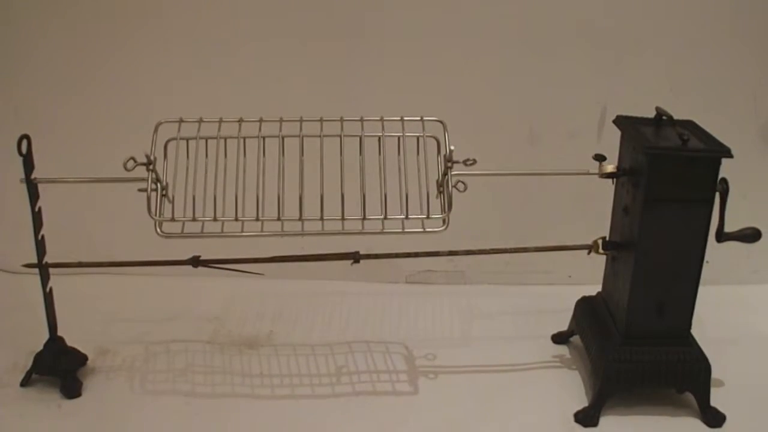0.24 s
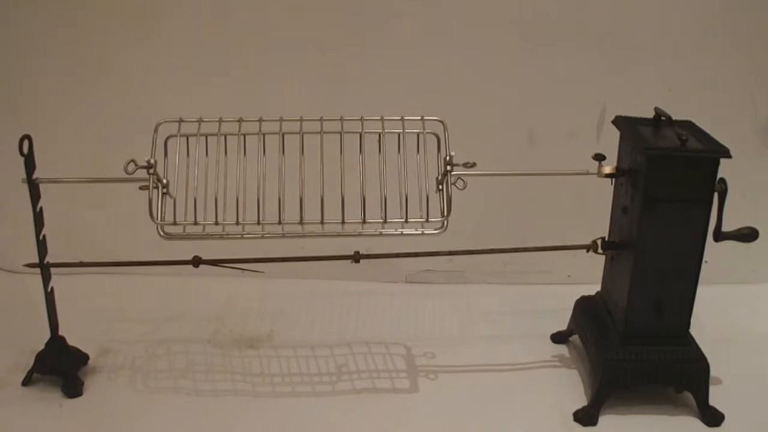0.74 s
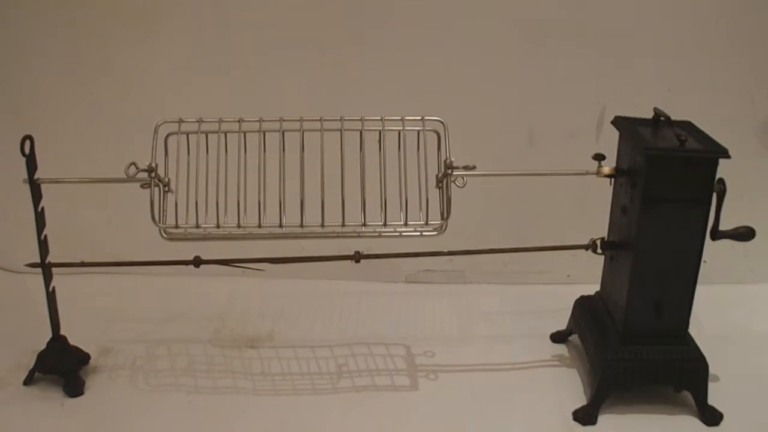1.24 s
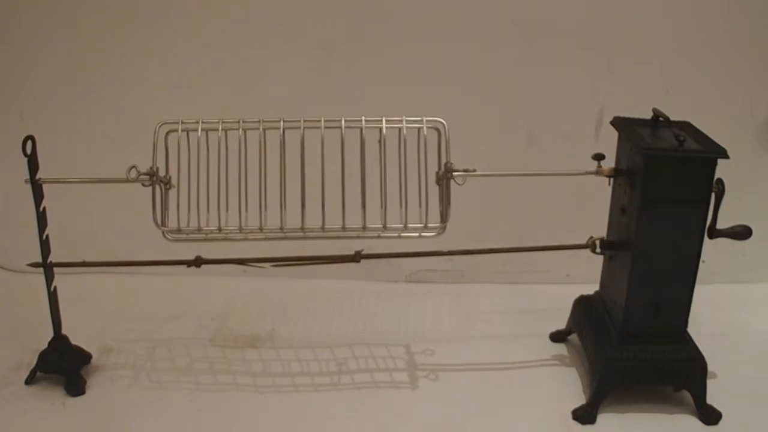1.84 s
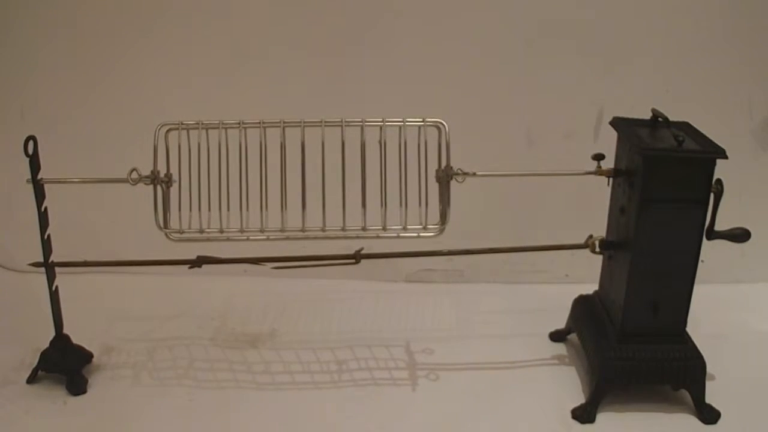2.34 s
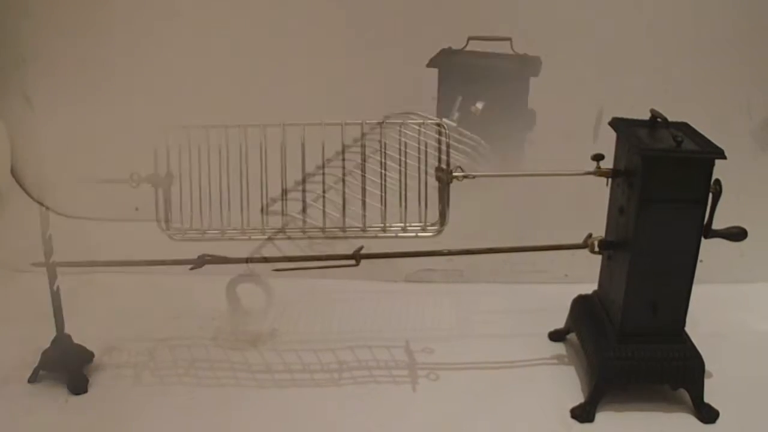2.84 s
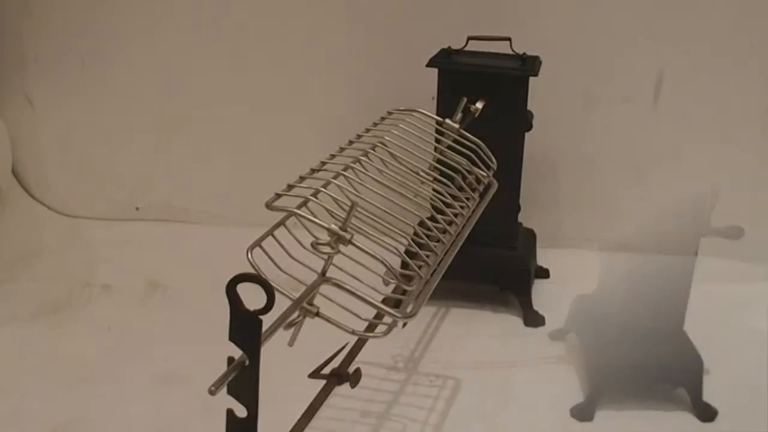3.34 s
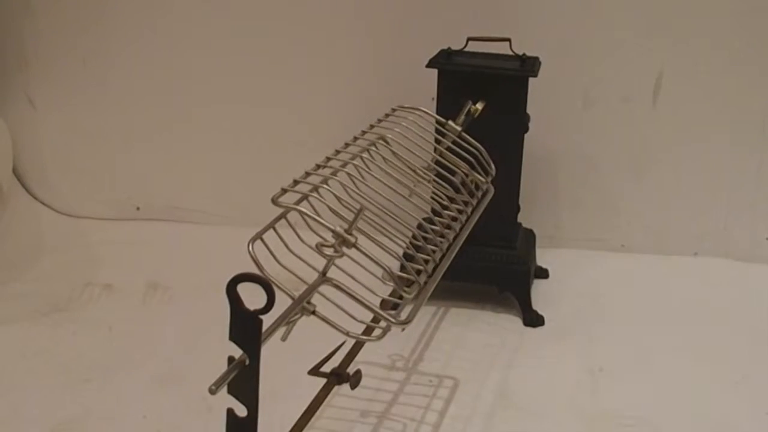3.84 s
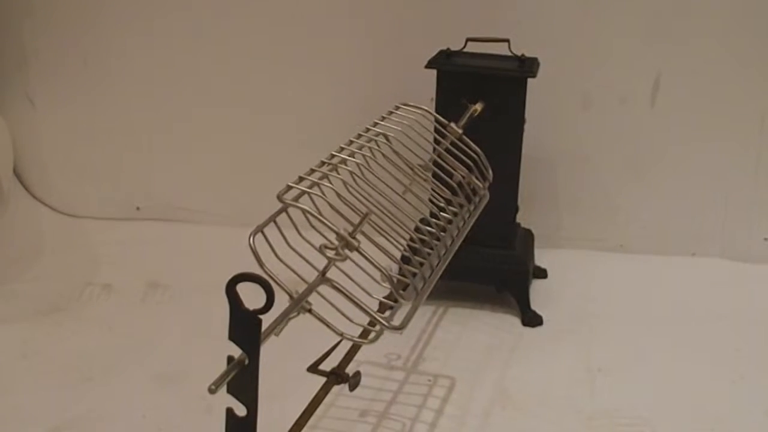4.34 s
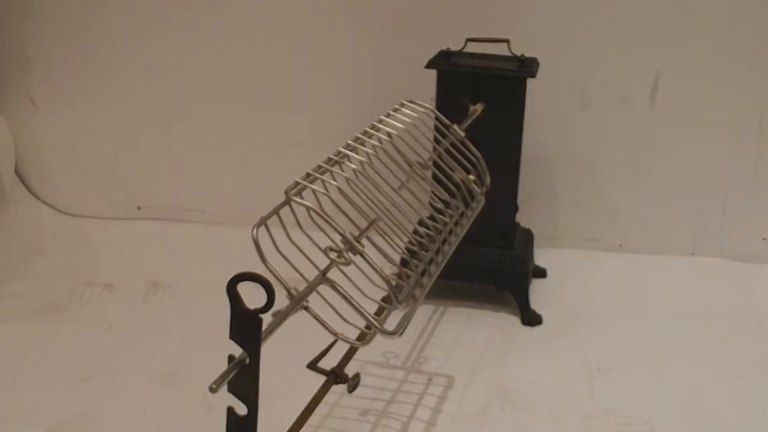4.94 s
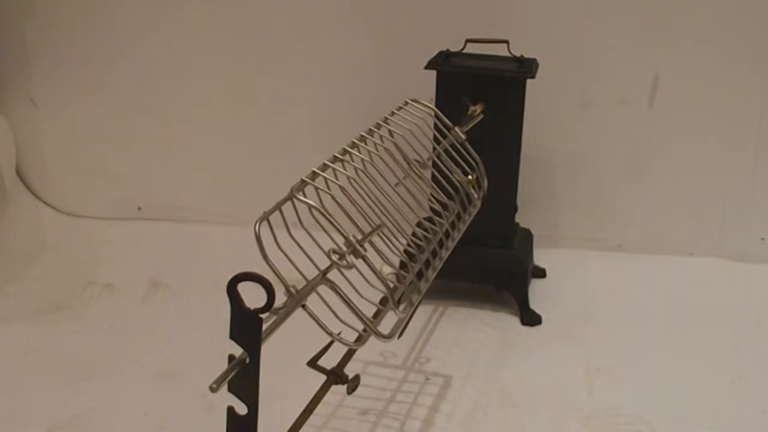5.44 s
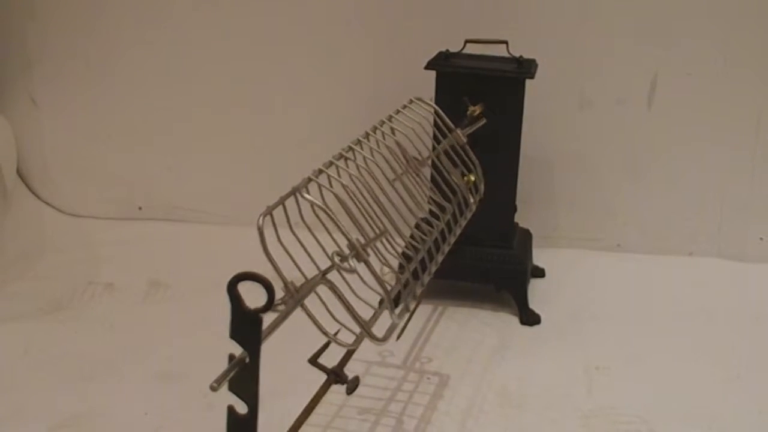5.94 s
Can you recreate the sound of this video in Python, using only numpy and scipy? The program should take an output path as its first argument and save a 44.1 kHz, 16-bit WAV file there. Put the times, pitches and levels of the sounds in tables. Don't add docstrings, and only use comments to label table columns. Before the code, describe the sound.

A spring-wound iron roasting jack whirs steadily with metallic gear ticking, while loud plasticky handling clicks and rubs strike close to the microphone midway.

```python
import sys
import numpy as np
from scipy import signal
from scipy.fft import rfft, irfft, next_fast_len
from scipy.io import wavfile
from scipy.ndimage import uniform_filter1d

SR = 44100
rng = np.random.default_rng(int(sys.argv[2]) if len(sys.argv) > 2 else 0)


def nominal_scale(level):
    x = np.asarray(level, float) / 20
    return 10 ** x


def digitize_waveform(pressure):
    field = np.atleast_2d(pressure).T
    bounded = np.clip(field, -1, 1)
    quanta = np.round(bounded * 32767).astype(np.int16)
    wavfile.write(sys.argv[1], SR, quanta)


N = 273861
TIME = np.arange(N) / SR
SECOND_IN_S, FIRST_OUT_S = 2.325, 3.795

# time [s], level [dB].
WHIRR_LEVEL = [(0.0, -42), (1.17, -42.5), (2.2, -40.5), (3.13, -40), (3.54, -40.5), (4.13, -43.5),
               (4.57, -43.5), (5.21, -43), (6.21, -43.5)]
HOUSING_HZ = [1100, 1225, 1410, 1640, 1880, 2040, 2600, 2800, 3000, 3215, 3450, 3935, 4400, 4840, 5750,
              7000, 7420, 8100, 8900, 9900]
# width [Hz], level [dB].
HOUSING_1 = [(54, -44), (61.5, 0), (85, 2.5), (87, 8.5), (101, 10), (115, -1), (74.074, -8), (80.4, 1),
             (124, 0), (162, 2.5), (122, 3), (173, 0), (250, -27), (250, -13), (500, -39), (300, -13),
             (250, -8), (300, -11), (300, -6), (500, -8)]
HOUSING_2 = [(22.9, -3), (84, 4), (103, 7.5), (153, 10.5), (105, 11.5), (128, -6), (79, -35), (74.074, 8.5),
             (130, 7), (140, 3.5), (120, 6.5), (182, 5.5), (250, -6), (250, -16.5), (540, -15), (300, -4),
             (250, -6), (300, -13), (300, 0), (500, -4)]
# centre [Hz], width [Hz], depth [0-1].
TABLETOP_1 = [(1490, 80, .4), (1775, 70, .7), (2240, 220, .7), (2710, 70, .5), (3650, 140, .7),
              (4190, 140, .6)]
TABLETOP_2 = [(1500, 90, .55), (1785, 60, .45), (2400, 280, .6), (3610, 150, .6), (4110, 170, .75)]
# centre [Hz], width [Hz], depth [0-1].
GRILLE = [(5350, 450, .6), (6500, 350, .4), (8590, 220, .6), (9400, 400, .7)]
# frequency [Hz], density [dB per Hz].
FLOOR = [(15, 0), (30, -9), (50, -5.5), (120, -13.5), (300, -10), (700, -19), (1500, -23), (5000, -41),
         (10500, -28), (14000, -27), (17000, -31.5)]
# frequency [Hz], level [dB].
MOTOR_LINES = [(29.5, -63), (87, -71.5), (225.7, -69), (2005, -59.5), (2808, -64), (5615, -77.5),
               (8021, -72.5), (11364, -80)]
# time [s], peak [dB], build-up [ms].
BUMPS = [(.52, -49, 11), (0.699, -43.5, 5.3), (0.851, -51, 10), (0.999, -47, 23), (1.17, -56, 16.4),
         (1.768, -46, 6.2)]
# frequency [Hz], width [Hz], level [dB].
TABLE = [(131, 128, 1), (75.4, 84, -13)]
KNOCK = [(362, 400, -0.35), (690, 530, -1.6)]
# time [s], peak [dB], glint [dB].
TICKS_1 = [(0.8693, -36, -21), (1.015, -39, -24), (1.1023, -28.5, -25), (1.3758, -26.5, -12),
           (1.476, -24, -7), (1.5594, -32.5, -22), (1.6903, -24, -10), (1.7716, -22, -2),
           (1.8766, -26.5, -26), (1.9892, -25.5, -13), (2.691, -32, -16), (2.8626, -21, -8),
           (2.9622, -23, -10), (3.054, -23.5, -25), (3.0738, -35, -20), (3.1004, -24.5, -22),
           (3.2884, -26, -12), (3.355, -34, -18), (3.4174, -26, -3)]
TICKS_2 = [(3.5455, -25, -5), (3.6475, -25, -7), (3.7408, -26.5, -2), (3.842, -34, -3), (3.864, -28.5, 1),
           (3.9421, -24, -7.5), (4.5267, -25.5, -1.5), (4.6276, -24, -15), (4.6967, -30, -16),
           (4.7204, -23.5, -11), (4.8216, -31, -21), (4.842, -23, -7), (4.9219, -25.5, -14),
           (5.0413, -23.5, -12), (5.5051, -24, -2.5), (5.6041, -24.5, -12), (5.7008, -26.5, -25),
           (5.7995, -23.5, -6.5), (5.8615, -26.5, -11), (5.9318, -25.5, -8), (5.995, -26, -7)]
# frequency [Hz], width [Hz], level [dB].
TOOTH = [(1104, 260, -5), (1620, 270, -10), (2140, 280, 0), (2730, 440, 1), (3473, 530, 2.5),
         (4110, 133, 2), (4800, 350, -8.5)]
THUMP = [(285, 91, -5), (131, 95, -13.5)]
GLINT = [(8260, 870, 44), (7000, 1500, -23), (9800, 2000, -29), (5800, 1500, -14)]
# time [s], peak [dB].
THUDS = [(1.377, -43), (1.563, -57), (1.773, -43), (1.876, -44), (2.862, -46), (3.544, -45), (3.742, -35),
         (3.864, -53), (3.941, -44.5), (4.526, -57), (4.843, -52), (4.922, -45), (5.505, -46.5), (5.8, -46)]
# time [s], peak [dB], hollow ring [dB], bright ring [dB], build-up [ms].
CLICKS_1 = [(2.8716, -11, -9.5, -7, 1.05), (2.876, -23, 1, -12, 1.47), (2.9038, -16.5, -25, 2.5, 3.2),
            (2.986, -24, -10, -7, 2.5), (3.1463, -3.5, -5, -0.5, 0.7), (3.157, -26, 4, 0, 2.6),
            (3.2236, 0, -12.5, -6.5, 0.27), (3.2233, -8.5, -15, 0, 0.77), (3.258, -28, 4, -12, 1.3),
            (3.3364, -28, -2, -2, 1.06), (3.7081, -12, -13, -9.5, 1.83), (3.7145, -20, -12, -14, 1.7)]
CLICKS_2 = [(3.7303, -7, 1, -8, 0.452), (3.737, -27, 6, -10, 1.3), (3.805, -4.5, -9.5, 1.5, 3.3),
            (4.158, -21, -7, 4, 1.3), (4.167, -25.5, -3, 6, 3.5), (4.194, 1.5, -15.5, -12.5, 4),
            (4.1941, -12.5, 5, 10, 0.75), (4.3815, -24.5, -2, -8, 0.57), (4.4255, -30, 1, -9, 0.58),
            (4.447, -34, 0, -4, 1.07), (4.469, -32, 5, -14, 1.5), (4.548, -34.5, 2, -8, 1.35)]
# frequency [Hz], width [Hz], level [dB].
SHELL = [(1649, 230, -1.5), (1965, 100, -4.5), (2109, 272, 1.5), (2430, 400, -6.5), (630, 370, -20),
         (5540, 4800, -36.5)]
HOLLOW = [(1153, 114, 0.5), (1047, 210, -1.5), (804, 285, -8)]
BRIGHT = [(2724, 540, 23), (3145, 250, 10), (3560, 150, 12.5), (4370, 670, -14)]
SNAP = [(7440, 500, -1), (8570, 970, -1), (10260, 1600, -16), (13700, 9900, -27)]
# start [s], rise [s], fade [s], level [dB], centre [Hz].
RUBS = [
    (3.15, .005, 0.014, -38, 9000),
    (3.691, 0.051, 0.049, -39.5, 1320),
    (4.049, 0.011, 0.077, -37, 2100),
    (4.13, 0.044, 0.032, -37.5, 2060),
    (4.384, 0.0027, 0.029, -33.5, 1420),
    (4.421, 0.0049, 0.044, -40, 1510),
    (4.46, 0.0067, 0.072, -46.5, 1040),
    (4.385, 0.013, 0.18, -50, 416),
]
# time [s], peak [dB], build-up [ms].
SWAYS = [(3.74, -48, 20.5), (3.82, -51, 25), (4.0, -55, 23), (4.2, -45, 12), (4.27, -51, 13),
         (4.33, -54, 20)]
THINNED = [0, 2, 6, 7, 31, 50, 51, 52, 54, 61, 65, 71, 90, 106]
# lower edge [Hz], upper edge [Hz].
STRONG_BANDS = [(0, 480), (900, 5100), (6250, 6400), (7050, 7200), (7450, 7600), (8800, 9000),
                (9850, 10000)]


def unit(x):
    return x / np.sqrt(np.mean(x ** 2))


def resonance(f, hz, width):
    return 1j * f * width / (hz ** 2 - f ** 2 + 1j * f * width)


def ring(x, modes, order=1):
    n = next_fast_len(len(x) + 2048)
    f = np.arange(n // 2 + 1) * SR / n
    response = sum(nominal_scale(db) * resonance(f, hz, width) ** order for hz, width, db in modes)
    return irfft(rfft(x, n) * response, n)


def walk(rate):
    hold = int(SR / rate)
    levels = np.repeat(rng.standard_normal(N // hold + 1), hold)
    return 1.25 * uniform_filter1d(uniform_filter1d(levels, hold), hold)[:N]


def whirr(housing):
    modes = [(hz, width, db) for hz, (width, db) in zip(HOUSING_HZ, housing)]
    load_db = 1.0 * walk(9) + 1.08 * walk(45)
    out = 0
    for part in (modes[:6], modes[6:14], modes[14:]):
        grain_db = 2.1 * rng.exponential(size=N) + load_db + 0.28 * walk(17)
        rubbing = rng.standard_normal(N) * nominal_scale(grain_db)
        out = out + ring(unit(rubbing), part)[:N]
    overlap = (TIME > SECOND_IN_S) & (TIME < FIRST_OUT_S)
    level_db = np.interp(TIME, *np.transpose(WHIRR_LEVEL)) + 0.5
    return unit(out) * nominal_scale(level_db - 2.5 * overlap)


def grille(x, tabletop):
    f = np.arange(N // 2 + 1) * SR / N
    treble = f / 10400
    response = 1 / (1 + 1j * treble) ** 2 * (0.36 + 0.7 / (1 + treble ** 30))
    for hz, width, depth in tabletop + GRILLE:
        response = response * (1 - np.clip(depth, 0, 1) * resonance(f, hz, width))
    return irfft(rfft(x) * response, N)


def camera(air_db):
    f = np.arange(N // 2 + 1) * SR / N + 1
    hz, density_db = np.transpose(FLOOR)
    colour = nominal_scale(np.interp(np.log(f), np.log(hz), density_db))
    air = irfft(rfft(rng.standard_normal(N)) * colour, N)
    lines = 0
    for line_hz, line_db in MOTOR_LINES:
        level = nominal_scale(line_db + 3 + 1.2 * walk(6))
        lines = lines + level * np.sin(2 * np.pi * line_hz * TIME + 0.7 * walk(5))
    return nominal_scale(air_db) * unit(air) + lines


def strikes(table, *bodies, grit_db=3, blow=2.5, fall_ms=1.5, tail_db=-16, tail_ms=6, size=4096):
    out = np.zeros(N + size)
    t_ms = 1000 * np.arange(size // 2) / SR
    chance = rng.standard_normal((len(table), 2, size // 2))
    for (s, peak_db, *rel_db, build_ms), (noise, grit) in zip(table, chance):
        after = np.clip(t_ms - build_ms, 0, None)
        rattle = np.exp(-after / fall_ms) + nominal_scale(tail_db) * np.exp(-after / tail_ms)
        force = np.clip(t_ms / build_ms, 0, 1) * rattle
        push = noise * nominal_scale(grit_db * grit)
        push[int(build_ms * SR / 1000)] += blow * np.sqrt(build_ms * SR / 1000)
        hit = 0
        for body, db in zip(bodies, [0, *rel_db]):
            hardness = np.clip(body[0][0] / 2200, 1, 2)
            part = ring(push * force ** hardness, body, order=2)[:size]
            hit = hit + nominal_scale(db) * part / np.abs(part).max()
        i = int(s * SR) - 20
        out[i:i + size] += nominal_scale(peak_db) * hit / np.abs(hit).max()
    return out[:N]


def bumps_and_jolts():
    bumps = [(s, db, -9, build_ms) for s, db, build_ms in BUMPS]
    jolts = [(s, -29 - 0.8 * db, 9.5, 1.17) for s, db, *_ in CLICKS_1 + CLICKS_2 if db > -9]
    return strikes(bumps + jolts, TABLE, KNOCK, blow=1.5, fall_ms=3, tail_db=-12, tail_ms=14)


def teeth(table):
    touches, seats = [], []
    for s, db, glint_db in table:
        thump_db = -51.5 - db
        touches.append((s - 0.0075, db - 7, thump_db - 11, glint_db - 6, 0.8))
        seats.append((s, db, thump_db, glint_db, 1.5))
    seat = strikes(seats, TOOTH, THUMP, GLINT, blow=0.21, fall_ms=3.5, tail_db=-26, tail_ms=3.5)
    touch = strikes(touches, TOOTH, THUMP, GLINT, blow=0.54, fall_ms=1.8, tail_db=-16, tail_ms=3.9)
    return seat + touch


def thuds():
    table = [(s, db, 2.5) for s, db in THUDS]
    return strikes(table, THUMP, blow=0.37, fall_ms=4.8, tail_db=-9, tail_ms=8.8)


def clicks(table):
    snapping = []
    for s, db, hollow_db, bright_db, build_ms in table:
        snap_db = -10.5 + bright_db + 0.25 * db
        snapping.append((s, db, hollow_db, bright_db, snap_db, build_ms))
    return strikes(snapping, SHELL, HOLLOW, BRIGHT, SNAP, blow=2.2, fall_ms=1.3, tail_db=-16, tail_ms=7)


def rubs():
    out = 0
    for s, rise, fade, db, hz in RUBS:
        shape = np.clip((TIME - s) / rise, 0, 1) * np.exp(-np.clip(TIME - s - rise, 0, None) / fade)
        skin = rng.standard_normal(N) * nominal_scale(3 * walk(200))
        drag = ring(skin, [(hz, hz, 0), (350, 400, -9)], order=2)[:N]
        out = out + nominal_scale(db) * shape * unit(drag)
    return out


def sways():
    return strikes(SWAYS, [(31.6, 16, 0)], blow=0.66, fall_ms=26, tail_db=-20, tail_ms=12)


def thin(x):
    f = np.arange(N // 2 + 1) * SR / N
    strong = sum((f >= low) & (f < high) for low, high in STRONG_BANDS)
    weak = irfft(rfft(x) * (1 - strong), N)
    frame = (TIME - 3.9187) / (1024 / 48000)
    return x - weak * sum(np.cos(np.pi / 2 * np.clip(frame - k, -1, 1)) ** 2 for k in THINNED)


def scene():
    first = grille(whirr(HOUSING_1) + teeth(TICKS_1), TABLETOP_1) + camera(air_db=-57) + clicks(CLICKS_1)
    jack_2 = whirr(HOUSING_2) + teeth(TICKS_2)
    second = grille(jack_2 + rubs(), TABLETOP_2) + camera(air_db=-58) + clicks(CLICKS_2)
    first = first * np.clip((FIRST_OUT_S - TIME) / 0.0025, 0, 1)
    second = thin(second) * np.clip((TIME - SECOND_IN_S) / 0.0056, 0, 1)
    left = np.roll(first, 1) + second
    right = first + second
    return np.array([left, right]) + bumps_and_jolts() + thuds() + sways()


def top_cut(x):
    return signal.sosfilt(signal.butter(12, 16480, fs=SR, output="sos"), x)


def record(dry):
    f = np.arange(N // 2 + 1) * SR / N
    cut = irfft(rfft(dry) * (f < 15950), N)
    mix = np.clip(cut, -1, 1)
    return top_cut(mix)


dry = scene()
out = record(dry)
digitize_waveform(out)
```